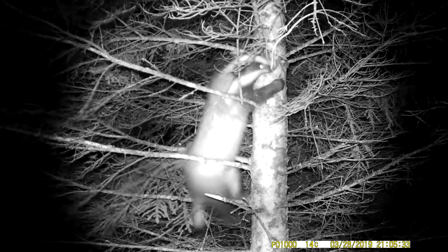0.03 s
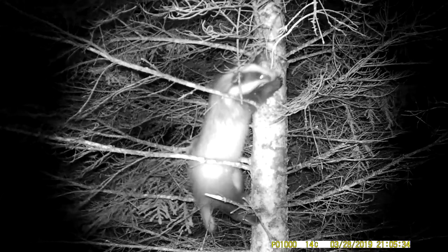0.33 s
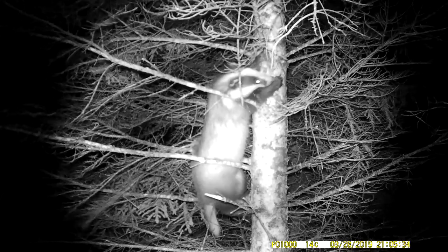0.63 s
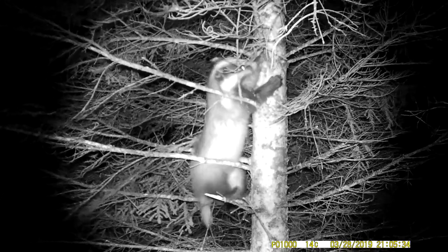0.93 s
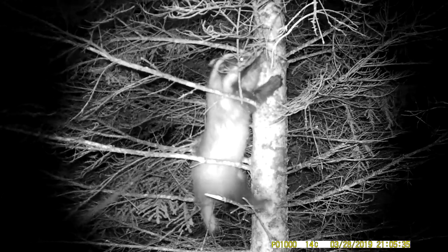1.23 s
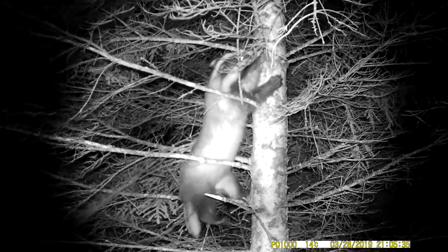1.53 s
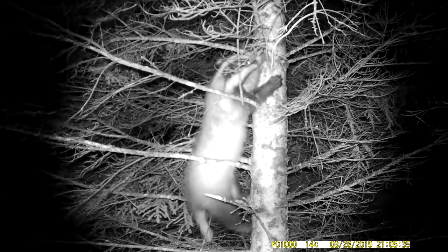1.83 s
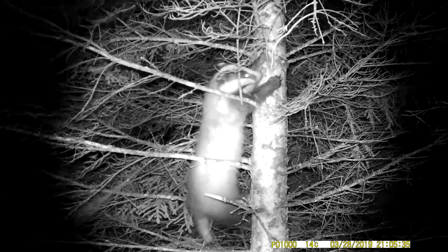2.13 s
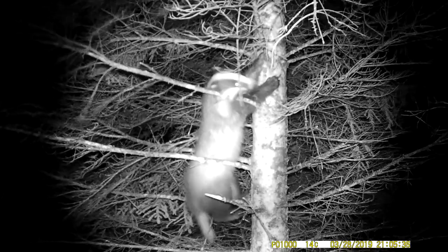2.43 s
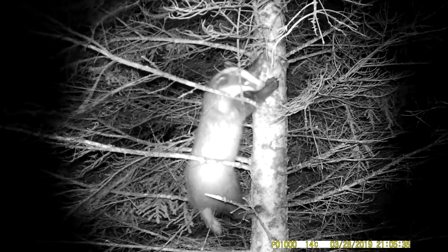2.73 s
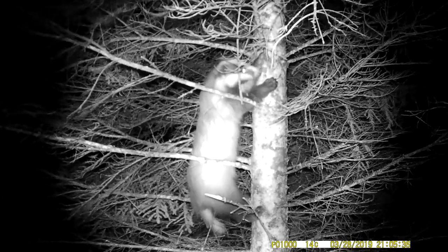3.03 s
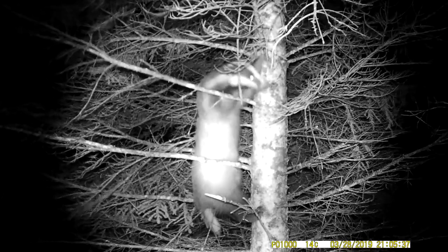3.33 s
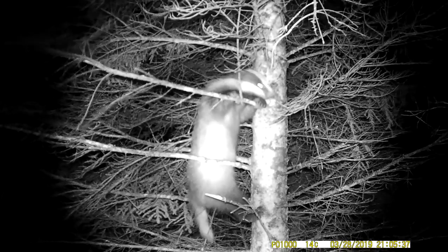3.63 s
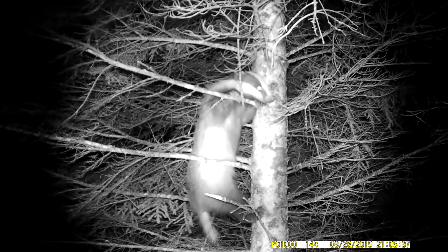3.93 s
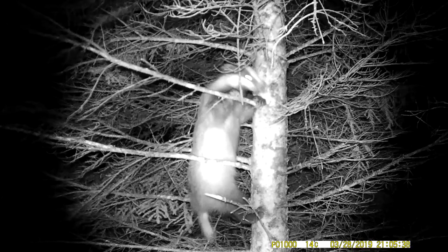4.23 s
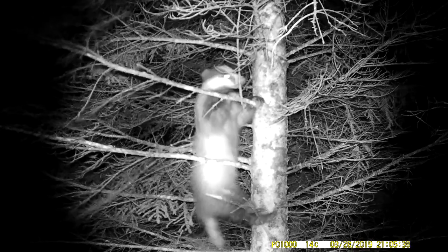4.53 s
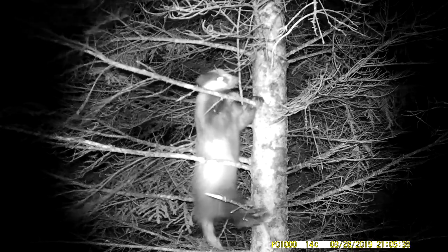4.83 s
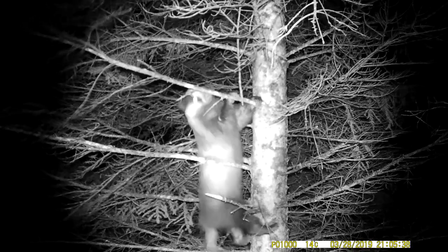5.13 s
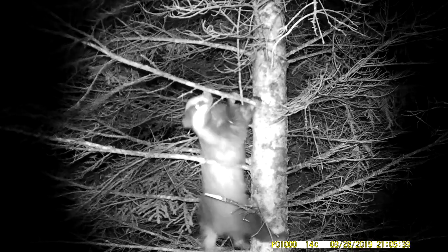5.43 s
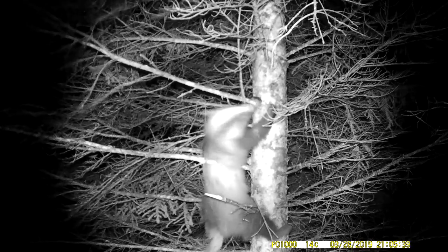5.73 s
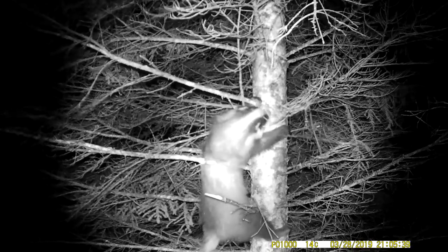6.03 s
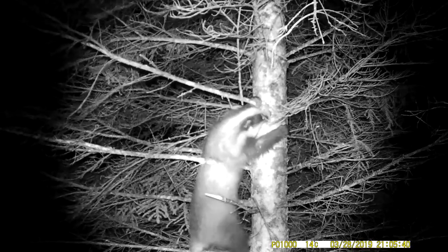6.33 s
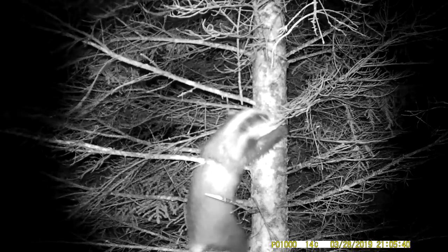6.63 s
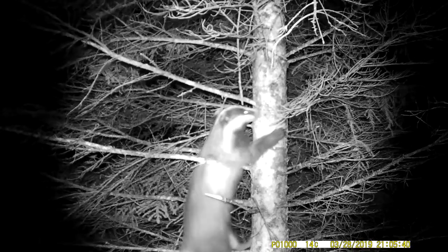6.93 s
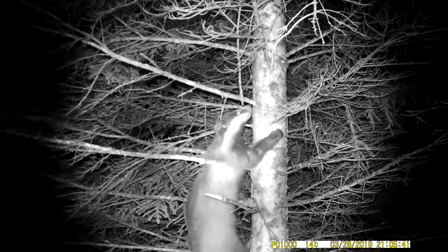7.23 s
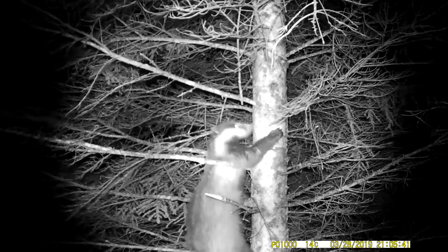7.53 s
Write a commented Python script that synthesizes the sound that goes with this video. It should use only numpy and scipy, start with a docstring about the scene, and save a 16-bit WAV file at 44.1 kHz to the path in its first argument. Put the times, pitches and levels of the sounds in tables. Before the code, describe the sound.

In a dense wood at night, faint wind and a thin microphone hiss run under the close sound of an animal climbing a tree. Its claws catch and skid on the bark in brief strokes, breaking off flakes and dry twigs with small, bright cracks and light woody knocks. The scratching starts scattered, with little pauses, then bunches into two louder spells of crackling in the second half.

```python
"""Badger climbing a spruce at night

Claws scrape the scaly bark, close up, in showers of tiny fractures; flakes and dry twigs snap,
and the dead wood rings faintly. The thicket scatters each crack back. Underneath sits a bed of
low wind in the trees and microphone hiss."""
import sys
import numpy as np
from scipy import signal
from scipy.fft import rfft, irfft, next_fast_len
from scipy.io import wavfile
from scipy.ndimage import uniform_filter1d, map_coordinates

SR = 44100
rng = np.random.default_rng(int(sys.argv[2]) if len(sys.argv) > 2 else 0)


def inscribe(sig):
    """Save sig as 16-bit PCM at rate SR to the path in sys.argv[1].

    A 1-D sig is mono; a 2-D sig holds one channel per row.
    Samples are clipped to [-1, 1] before scaling.
    """
    pcm = np.round(np.clip(np.atleast_2d(sig).T, -1, 1) * 32767)
    wavfile.write(sys.argv[1], SR, pcm.astype(np.int16))


N = 338688

# The wind's rise and fall. Each row: time in seconds, relative level in dB.
WIND_LEVELS = [(0.0, -57.5), (0.64, -58.5), (0.9, -58), (3.61, -56.5), (3.96, -58.5), (5.88, -55),
               (6.54, -57.5), (7.06, -55.5), (7.68, -56.5)]
# Gusts in the farther treetops. Each row: start in seconds, start of the fade in seconds.
GUST_TIMES = [(-.3, .3), (.62, 2.08)]
# Tone of the wind's rush. Each row: frequency in Hz, relative level in dB.
WIND_EQ = [(20, 1.5), (60, -0.5), (130, -2), (220, 0), (330, -0.5), (440, -2), (590, -4.5), (780, -3.5),
           (1100, -9), (1500, -15), (2200, -24), (4000, -27), (9000, -62)]
# The gusts' two hollow bands. Each row: frequency in Hz, relative level in dB.
GUST_EQ = [(330, -25), (450, 2), (540, -7.5), (640, -8), (760, -5.5), (890, -1.5), (1080, -22), (2000, -67)]
# Low drone under the wind. Each row: frequency in Hz, relative level in dB.
DRONE_EQ = [(10, -15), (24, -8), (32, 4.5), (41, -3), (52, -7.5), (80, -21), (200, -53)]
# Microphone hiss. Each row: frequency in Hz, relative level in dB.
HISS_EQ = [(500, -1), (2400, -4), (3800, -3.5), (5100, 1), (6300, -3), (8000, -4.5), (12000, -5),
           (15000, -6), (16000, -13)]
# The thicket's tail. Each row: frequency in Hz, time to fall 60 dB in seconds.
THICKET_DECAY = [(1000, 0.19), (5000, 0.051), (14000, 0.2)]
# Resonances of the dead wood. Each row: pitch in Hz, bandwidth in Hz, relative level in dB.
WOOD_MODES = [(1710, 193, 0), (2354, 450, -6.5), (3114, 360, -3)]
# Tone of the crackle, ringing near 5 kHz. Each row: frequency in Hz, relative level in dB.
CRACKLE_EQ = [(1200, -38), (2600, -30), (3300, -8.5), (4300, -0.5), (5250, 0), (6200, -5.5), (7400, -13.5),
              (10000, -32), (15500, -45)]
# Tone of the thinnest, crispest bark scales. Each row: frequency in Hz, relative level in dB.
SCALES_EQ = [(3000, -36), (6000, -15), (8000, -1), (10200, -2.5), (12500, -8.5), (15500, -10.5)]
# Fur brushing trunk and twigs as the body shifts. Each row: time in seconds, relative level in dB.
FUR_RUSTLE = [(0, -68), (.75, -68), (1.4, -73), (2.1, -66), (3.15, -72), (3.7, -63), (3.95, -71),
              (4.25, -68), (4.45, -62), (4.7, -65), (5.5, -68), (5.75, -65), (6.03, -62), (6.3, -67),
              (6.56, -70), (6.7, -56), (7.2, -55), (7.68, -60)]
# Claws dragged over the bark. Each row: start in seconds, length in seconds, relative level in dB,
# woody share in dB.
CLAW_STROKES = [(0, .035, -51, -6), (.452, .03, -57, -13), (0.612, .018, -55, -5), (.672, .03, -59, -10),
                (1.09, .045, -62, -6.5), (1.55, .03, -64, -6), (1.597, .028, -59, -4), (1.69, .04, -55, -9),
                (1.896, .046, -48, -5), (1.97, .04, -57, -10.5), (2.036, .035, -60, -6),
                (2.125, .075, -64, -17), (3.215, .03, -54, -15), (3.349, .03, -61, -8),
                (3.479, .075, -58, -9), (3.565, .05, -56, -7), (3.62, .025, -49, -8),
                (3.68, .055, -58, -10), (4.37, .045, -53, -5.5), (4.42, .075, -60, -7),
                (4.795, .035, -49, -4), (4.835, .068, -44, -11.5), (4.927, .019, -39, -18),
                (5.203, .034, -49, -10), (5.335, .055, -58, -6), (5.525, .03, -59, -8.5),
                (5.578, .03, -57, -8), (5.78, .14, -58, -3), (5.915, .025, -52, -2.5),
                (5.969, .05, -58, -10), (6.027, .04, -53, -1.5), (6.075, .095, -57, -8),
                (6.205, .025, -59, -5), (6.38, .04, -62, -8), (6.635, .07, -58, -6),
                (6.752, .03, -47, -4.5), (6.865, .04, -52.5, -4.5), (6.911, .06, -47, -4),
                (6.961, .05, -43, -6), (7.01, .075, -45, -6), (7.148, .022, -44, -10.5),
                (7.175, .022, -48, -22), (7.343, .035, -55.5, -13), (7.429, .035, -49, -9)]
# Dry twigs bending. Each row: start in seconds, length in seconds, pitch in Hz, level in dB.
TWIG_CREAKS = [(1.917, 0.016, 4360, -54.5), (2.259, 0.009, 4980, -56), (3.216, 0.012, 3130, -54),
               (3.229, 0.0108, 3440, -47.5), (6.276, 0.00697, 3060, -56)]
# The loudest flakes and twigs breaking. Each row: start in seconds, relative level in dB,
# ping pitch in Hz, woody send in dB, crisp send in dB.
BARK_SNAPS = [(0.04, -43.5, 5100, -21, -23), (0.2462, -39, 5550, -26, -8), (0.252, -44, 5170, -18, -3.5),
              (0.4587, -35, 5290, -24, -14.5), (0.623, -49.5, 4960, 1.5, -8),
              (0.6707, -50.5, 4750, -4, -8.5), (1.111, -53.5, 4600, -7, -5.5),
              (1.129, -57.5, 5590, -12, 0.5), (1.214, -55, 5630, -20, -15), (1.2525, -48.5, 5500, -28, -11),
              (1.7055, -43.5, 5300, -18.5, -10), (1.7128, -46, 3880, 0.5, -5), (1.8355, -57, 5000, -12, -8),
              (1.921, -38.5, 4550, -9.5, -20), (1.9421, -45.5, 5000, -6, -7),
              (2.093, -50.5, 5250, -11.5, -17), (2.134, -49.5, 5400, -11, -13.5),
              (2.1671, -54, 5840, -24, -11), (2.195, -52, 6100, -20, -10), (2.262, -50.5, 4860, -14, -24),
              (2.3968, -36, 5000, -11, -24), (2.459, -40.5, 5330, -15.5, -13.5),
              (2.493, -45.5, 5200, -10, -7), (2.5106, -46, 5000, -23, -12), (2.606, -39.5, 5000, -9, -4),
              (2.6241, -45.5, 4560, -5, -9), (2.6941, -44, 5100, -0.5, -12), (2.7547, -46, 5290, -22, -7),
              (2.8249, -50, 5720, -12, -14), (2.893, -34.5, 5700, -20, -12), (3.2333, -44, 4350, -2, -27),
              (3.2408, -42.5, 3860, -12, -31.5), (3.374, -47, 5700, -22, -3),
              (3.615, -34.5, 4640, -9.5, -9), (3.6319, -41, 4900, -19, -16), (4.026, -53, 5200, -22, -19),
              (4.078, -52, 5000, -7, -8), (4.1491, -54, 5300, -7, -18.5), (4.285, -50, 4960, 0.5, -11.5),
              (4.3099, -49, 5000, -13, -15), (4.3326, -39.5, 4300, -1, -16), (4.3347, -40.5, 4920, -4, -5),
              (4.376, -46, 4850, -13, -18), (4.3805, -43.5, 4800, -13, -5), (4.3936, -42, 5400, -14, -10),
              (4.5674, -48.5, 4610, -11, -11), (4.6695, -50.5, 5100, -15, -10),
              (4.8094, -40.5, 5450, -22, -11), (4.8634, -38, 4900, -5, -17),
              (4.8989, -31.5, 5500, -19, -10), (4.9024, -33, 5500, -20, -13),
              (4.9354, -28.5, 5010, -26, -16), (4.9409, -28, 5500, -26.5, -16),
              (4.9454, -33, 5400, -20, -7.5), (4.9575, -37, 5130, -19.5, -16),
              (5.0027, -44.5, 5100, -11, -17), (5.031, -45.5, 5400, -3, -11),
              (5.238, -36.5, 5800, -20, -12), (5.3942, -48.5, 3800, -4, -16.5),
              (5.5932, -46, 4767, -1, -15), (5.668, -51, 5190, -12, -14), (5.726, -44, 4970, -22, -18),
              (5.808, -47.5, 5145, -7, -6), (5.8501, -42, 4906, -23, -23), (5.8904, -43.5, 4780, -7, -1),
              (5.9312, -41, 5240, -4, 1), (6.0406, -40, 4370, -5, -7), (6.044, -44, 4700, -1, -10),
              (6.474, -50, 4780, -6, -13), (6.727, -49, 4870, -3, -6), (6.7548, -42.5, 4950, -5.5, -4),
              (6.7706, -42.5, 4500, 2, -3), (6.8136, -45.5, 5150, -9, -7.5), (6.9159, -42, 4840, -9, -10),
              (6.972, -29, 5200, -32, -16), (6.9874, -31, 5620, -21.5, -28.5),
              (6.9964, -37.5, 5150, -10, -23), (7.004, -32, 5280, -12, -27), (7.0514, -39.5, 4920, -12, -8),
              (7.0583, -34, 5500, -22.5, -10.5), (7.072, -29.5, 5200, -27.5, -15),
              (7.1081, -39, 4750, -15, -21), (7.161, -39, 4900, -4, -16), (7.235, -46.5, 4960, -18, -16.5),
              (7.3044, -47, 4810, -9, -4.5), (7.4428, -41.5, 4800, -5, -20), (7.468, -43.5, 4865, -13, -24),
              (7.5334, -46.5, 5140, -12, -7.5)]


def amp(db):
    """Decibels to gain."""
    return 10 ** (np.asarray(db) / 20)


def unit(x):
    """Normalise to rms 1."""
    return x / np.sqrt(np.mean(x ** 2) + 1e-20)


def unit_energy(x):
    """Normalise a one-shot to energy 1."""
    return x / np.linalg.norm(x)


def along(points, hz):
    """Read (Hz, value) points on a log frequency axis."""
    freqs, values = np.transpose(points)
    return np.interp(np.log(hz + 1), np.log(freqs), values)


def curves(rows):
    """Draw a per-sample envelope for each column after the time."""
    times, *columns = np.transpose(rows)
    return [np.interp(np.arange(N) / SR, times, column) for column in columns]


def filtered(x, response):
    """Shape x with a frequency response."""
    size = next_fast_len(N + SR // 2)
    return irfft(rfft(x, size) * response(np.fft.rfftfreq(size, 1 / SR)), size)[:N]


def noise(eq):
    """Coloured noise of rms 1."""
    return unit(filtered(rng.standard_normal(N), lambda hz: amp(along(eq, hz))))


def colour(x, eq, size=512):
    """Minimum-phase EQ, which keeps the attacks sharp."""
    cepstrum = irfft(np.log(amp(along(eq, np.fft.rfftfreq(size, 1 / SR)))))
    cepstrum[size // 2:] = 0
    impulse = irfft(np.exp(rfft(2 * cepstrum)))
    return signal.fftconvolve(x, impulse)[:N]


def wobble(rate):
    """A smooth random curve with rate knots a second."""
    knots = rng.standard_normal(int(N * rate / SR) + 4)
    return map_coordinates(knots, [np.arange(N) * rate / SR])


def add(track, start, sound):
    """Drop a sound onto the track at start seconds."""
    part = track[round(start * SR):][:len(sound)]
    part += sound[:len(part)]


def wind(gust_rise_s=0.21, gust_fall_s=0.076):
    """Air rushes through the trees over a low drone; gusts moan in farther treetops."""
    rush_db, = curves(WIND_LEVELS)
    t = np.arange(N) / SR
    gusts = sum(np.interp(t, [start, start + gust_rise_s, end, end + gust_fall_s], [0, 1, 1, 0])
                for start, end in GUST_TIMES)
    rush = amp(rush_db + 2.5) * noise(WIND_EQ)
    moan = (amp(-74.5) + amp(-61.5) * gusts) * noise(GUST_EQ)
    return rush + moan + amp(-59) * noise(DRONE_EQ)


def microphone_hiss():
    """The microphone's own steady noise floor."""
    return amp(-66) * noise(HISS_EQ)


def echoes():
    """Trunk and near twigs throw back quick reflections; the branches beyond leave a short haze."""
    hz, t, spectrum = signal.stft(rng.standard_normal(SR // 4), SR, nperseg=256)
    decay = amp(-60 * t / along(THICKET_DECAY, hz)[:, None])
    haze = signal.istft(spectrum * decay, SR, nperseg=256)[1]
    age = np.arange(len(haze)) / SR
    taps = rng.standard_normal(len(haze)) * (rng.random(len(haze)) < 3000 / SR)
    near = taps * amp(-60 * age / 0.027) * (age > .001)
    return amp(-9.5) * unit_energy(near) + amp(-17.5) * unit_energy(haze)


def thicket(x, block=3072):
    """The paws keep moving, so every stretch of sound meets different echoes."""
    wet = np.zeros(N)
    for start in range(0, N, block):
        add(wet, start / SR, signal.fftconvolve(x[start:start + block], echoes()))
    return wet


def dead_wood(x):
    """Knocks and scrapes ring the wood's damped resonances."""
    t = np.arange(SR // 50) / SR
    ring = sum(amp(db) * width * np.exp(-np.pi * width * t) * np.sin(2 * np.pi * hz * t) * (-1) ** k
               for k, (hz, width, db) in enumerate(WOOD_MODES))
    return signal.fftconvolve(x, unit_energy(ring))[:N]


def ping(hz, life_s, size=512):
    """A few cycles that swell and die in about a millisecond."""
    t = np.arange(size) / SR
    return unit_energy((t / life_s) ** 1.6 * np.exp(-t / life_s) * np.sin(2 * np.pi * hz * t))


def burst(hz, width_hz, life_s, size=512):
    """A dying shiver of noise around hz, coloured differently on every hit."""
    t = np.arange(size) / SR
    shiver = rng.standard_normal(size) * np.exp(-t / life_s)
    return unit_energy(np.convolve(shiver, ping(hz, 1 / (np.pi * width_hz)))[:size])


def creaks():
    """A bending twig sticks and slips in a quick run, ringing at one pitch."""
    track = np.zeros(N)
    for start, length, hz, db in TWIG_CREAKS:
        count = max(round(length * SR), 64)
        slips = rng.standard_normal(count) ** 3
        run = np.convolve(slips, ping(hz, life_s=0.00019))
        add(track, start, amp(db) * np.sqrt(count) * unit_energy(run))
    return track


def swell(t, start, end, rise_db_per_s, fall_db_per_s):
    """Gain of 1 from start to end, sloping away on either side."""
    return amp(-rise_db_per_s * np.maximum(start - t, 0) - fall_db_per_s * np.maximum(t - end, 0))


def drag(attack_s=.014, release_db_per_s=420, strain_db_per_s=2600):
    """Fur, claws and crumbs add in power, giving the scrape's level and woody share in dB."""
    t = np.arange(0, N / SR, .001)
    fur = amp(np.interp(t, *np.transpose(FUR_RUSTLE)))
    layers = [(fur, -8)]  # envelope, woody share in dB
    for start, length, db, woody_db in CLAW_STROKES:
        # The paw brushes the bark, the claws bite and pull, loosened crumbs keep falling.
        end = start + length
        brush = amp(db - 16) * swell(t, start, end, 451, release_db_per_s)
        bite = np.clip((t - start) / attack_s, 0, 1)
        pull = amp(db) * bite * swell(t, start, end, 0, release_db_per_s)
        trickle = amp(db - 17) * bite * swell(t, start, end, 0, fall_db_per_s=70)
        layers += [(pull, woody_db), (brush, woody_db), (trickle, -10)]
    for start, db, _, woody_db, _ in BARK_SNAPS:
        # A flake crackles under strain just before it breaks, then sheds crumbs.
        strain = amp(db - 18) * swell(t, start, start, strain_db_per_s, strain_db_per_s)
        shed = amp(db - 21) * swell(t, start, start, strain_db_per_s, fall_db_per_s=400.5)
        layers += [(strain, woody_db), (shed, woody_db)]
    power = sum(gain ** 2 for gain, _ in layers)
    woody_power = sum((gain * amp(db)) ** 2 for gain, db in layers)
    return curves(np.transpose([t, 10 * np.log10(power), 10 * np.log10(woody_power / power)]))


def fractures(per_second, scatter_db):
    """A shower of tiny breaks, each a grain with its own pitch and size."""
    starts = np.flatnonzero(rng.random(N) < per_second / SR)[:, None]
    hz = rng.uniform(1200, 12600, starts.shape)
    sizes = amp(scatter_db * rng.standard_normal(starts.shape))
    steps = np.arange(SR // 400)
    t = steps / SR
    phase = 2 * np.pi * (hz * t + rng.random(starts.shape))
    grains = sizes * np.exp(-t / 0.00021) * np.cos(phase)
    return np.bincount((starts + steps).ravel(), grains.ravel(), N)[:N]


def steady(x):
    """Evens out the crackle's loudness over about 25 ms."""
    power = np.abs(uniform_filter1d(x ** 2, size=1100))
    return unit(x / np.sqrt(power + 0.047 * power.mean()))


def scrape(drag_db, woody_db):
    """A harder drag breaks more scales a second; the level jumps as the claws catch and skid."""
    catch_db = 2.23 * wobble(rate=100)
    grains = fractures(per_second=3200 * amp(.5 * (drag_db + 55)), scatter_db=4.5)
    crackle = steady(colour(grains, CRACKLE_EQ))
    crisp_db = -10 + 0.28 * (woody_db + 7.5)  # dry twigs give both crispness and body
    scales = amp(crisp_db) * steady(colour(grains, SCALES_EQ))
    hollow = amp(woody_db) * steady(dead_wood(grains))
    rub = amp(-6.5) * noise(CRACKLE_EQ)  # fur and pads slide smoothly
    return amp(drag_db + catch_db - 1.5) * (crackle + scales + hollow + rub)


def small_flakes(drag_db, count):
    """Flakes tick off at random, denser and louder under a hard drag; rows as in BARK_SNAPS."""
    chance = np.cumsum(amp(.8 * drag_db))
    starts = np.searchsorted(chance, rng.random(count) * chance[-1])
    rows = []
    for i, (size, brightness, edge) in zip(starts, rng.standard_normal((count, 3))):
        db = -51 + 0.47 * (drag_db[i] + 55) + 1.5 * size
        hz = 5100 * np.exp(.08 * brightness)
        rows.append((i / SR, db, hz, -8.5 - 4 * brightness, -12.5 + 4 * edge))
    return rows


def splinters(spread_s, level_db, count=5):
    """One break, then a few after-fractures as the crack runs on."""
    train = np.zeros(SR // 100)
    delays = np.minimum(.0005 + spread_s * rng.exponential(size=count), .009)
    train[(delays * SR).astype(int)] = amp(level_db) * rng.standard_normal(count)
    train[0] = 1
    return train


def snaps(drag_db):
    """Each break pings at its own pitch, with a crisp edge and a knock in twig and trunk."""
    flakes, knocks = np.zeros(N), np.zeros(N)
    for start, db, hz, woody_db, crisp_db in BARK_SNAPS + small_flakes(drag_db, count=55):
        ring = ping(hz, life_s=0.658 / hz) + amp(-10) * burst(hz, width_hz=2700, life_s=0.0012)
        crack = splinters(spread_s=0.0015, level_db=-17 - 0.96 * (db + 45))  # weak flakes crumble more
        body = unit_energy(np.convolve(crack, ring))
        edge = amp(crisp_db) * burst(8600, width_hz=5700, life_s=0.0012)
        knock = amp(woody_db) * burst(2380, width_hz=1950, life_s=0.0013)
        add(flakes, start, amp(db + 20.5) * body)
        add(flakes, start, amp(db + 20.5) * edge)
        add(knocks, start, amp(db + 8) * knock)
    return flakes + knocks + dead_wood(knocks)


def scene():
    """Mono mix: the climb up front, its echoes behind, wind and hiss underneath."""
    drag_db, woody_db = drag()
    climb = snaps(drag_db) + creaks() + scrape(drag_db, woody_db)
    return (climb + thicket(climb) + wind() + microphone_hiss())[None]


def record(dry, top_hz=15850):
    """The trail camera's band limit is a brick-wall high cut."""
    return filtered(dry[0], lambda hz: hz < top_hz)[None]


dry = scene()
out = record(dry)
inscribe(out)
```